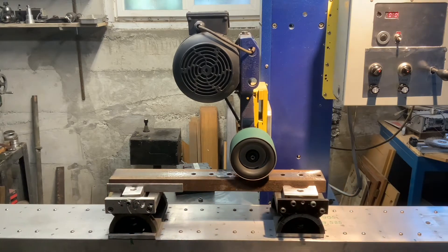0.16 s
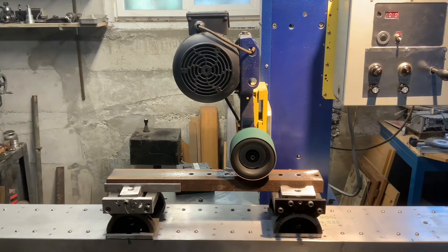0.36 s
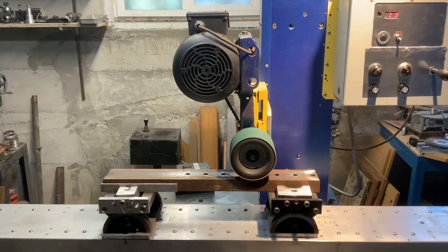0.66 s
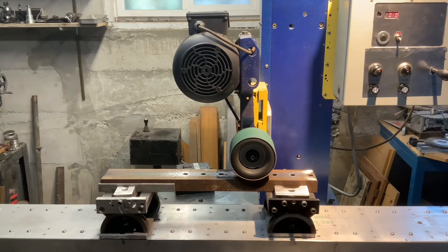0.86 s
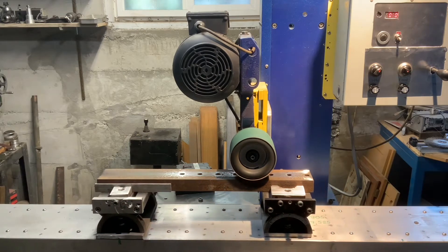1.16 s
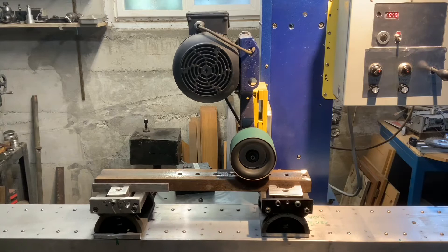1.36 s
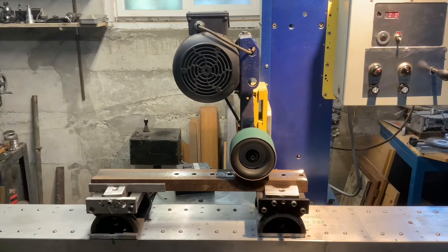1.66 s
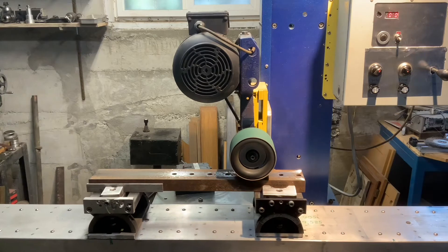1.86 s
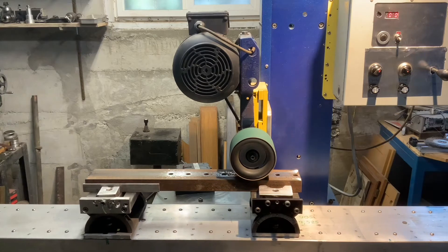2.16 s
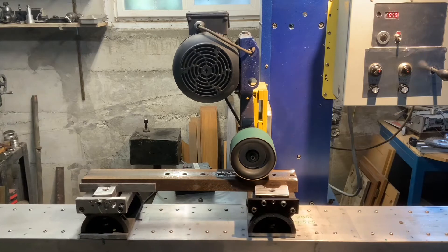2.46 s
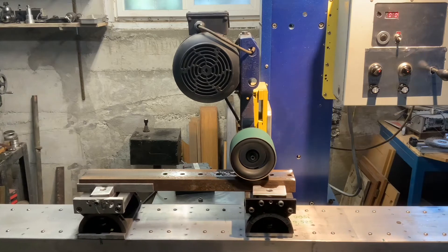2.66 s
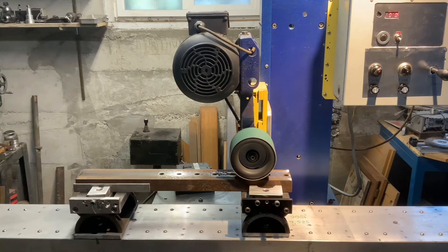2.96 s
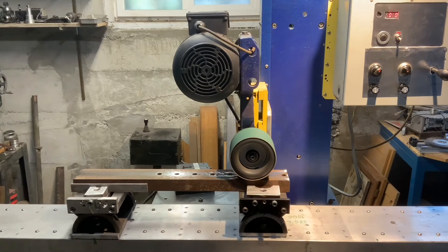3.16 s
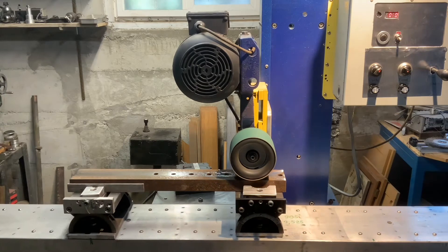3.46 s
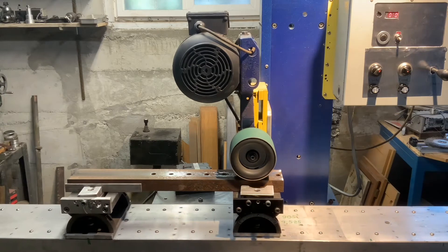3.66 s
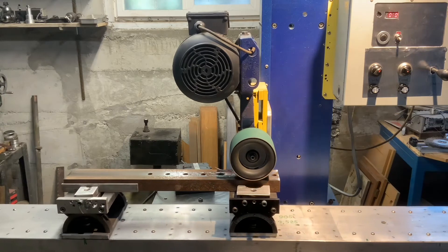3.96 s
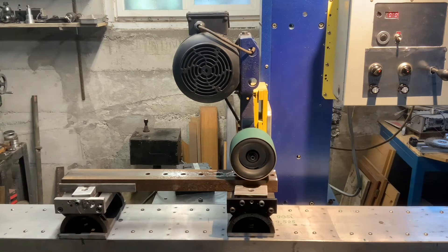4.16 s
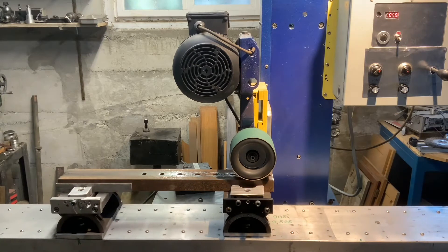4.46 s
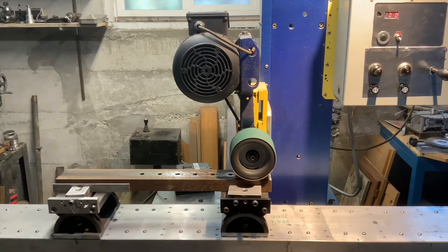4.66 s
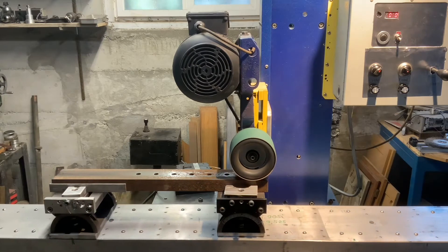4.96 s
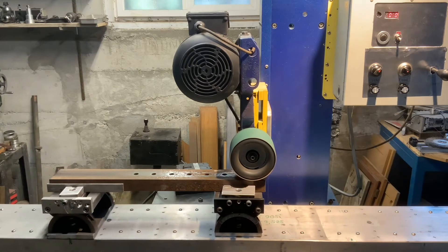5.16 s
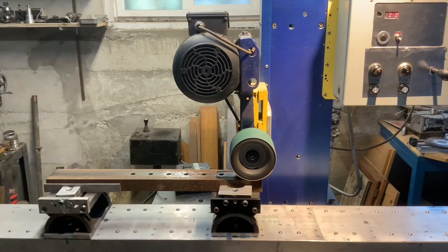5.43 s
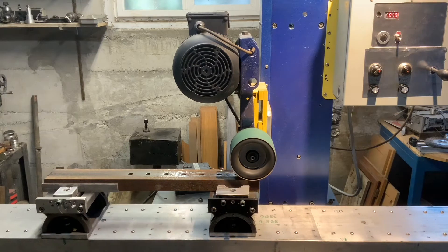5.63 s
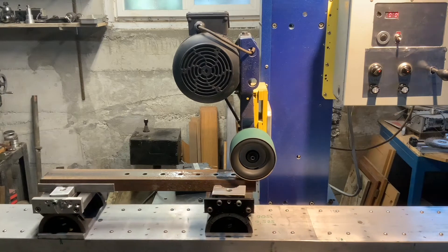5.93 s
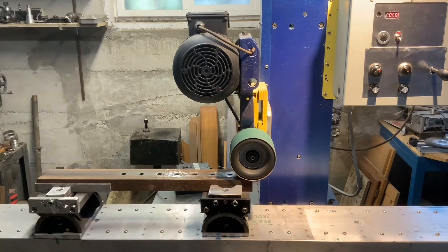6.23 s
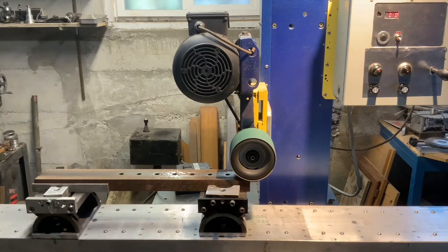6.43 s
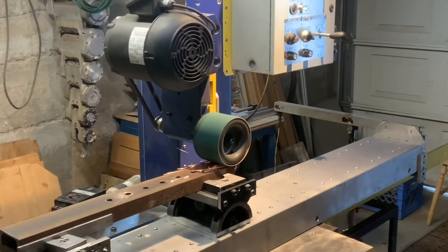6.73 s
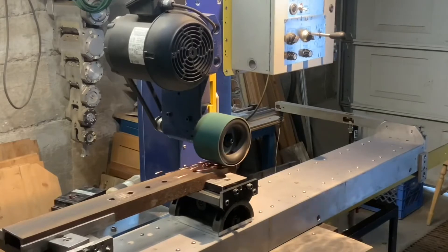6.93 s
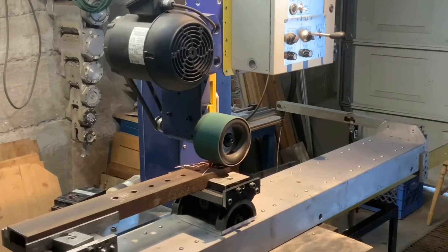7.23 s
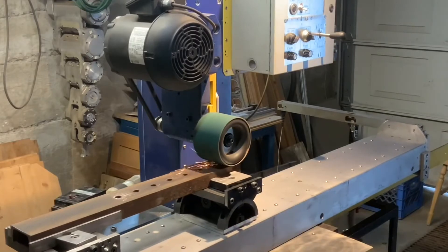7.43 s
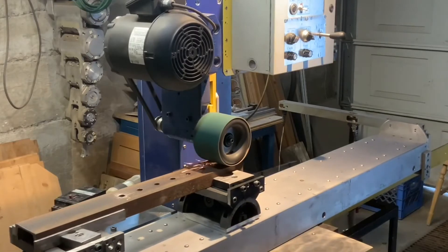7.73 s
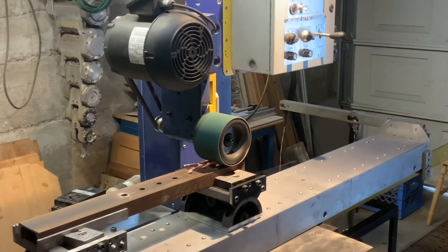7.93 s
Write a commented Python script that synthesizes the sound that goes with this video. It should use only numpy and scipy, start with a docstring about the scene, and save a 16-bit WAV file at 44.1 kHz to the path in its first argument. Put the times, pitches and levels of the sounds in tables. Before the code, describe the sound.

In a hard-walled workshop, a belt grinding machine runs without pause. A harsh, fluttering high whine dominates, with bright hiss from belt and motor fan and faint ringing of loose metal parts. The grind swells softly several times. Late on, the sound dips for an instant and resumes from a side position with altered tone; one soft low knock follows. Close stereo pickup, little bass.

```python
"""In a workshop, a belt surface grinder runs, heard from the front and, after a brief fade, from the side.
Bearing balls of the contact wheel roll over a flaw in the turning inner ring: a whine of modulated harmonics.
Loose parts ring with random pitch waver, shaken by the cage and the belt lap; belt and motor fan give
filtered noise, its treble pulsed by the balls. One soft knock sums two decaying modes.
Two microphone ports a little apart receive the sound with different phase, level and reflections."""
import sys
import numpy as np
from scipy import signal
from scipy.fft import rfft, irfft, next_fast_len
from scipy.io import wavfile
from scipy.ndimage import map_coordinates

SR = 44100
rng = np.random.default_rng(int(sys.argv[2]) if len(sys.argv) > 2 else 0)


def dump_mix(stems):
    """Bounce the given channels to the path in sys.argv[1] as a 16-bit WAV at rate SR."""
    frames = np.atleast_2d(stems).T  # one column per channel
    limited = np.clip(frames, -1, 1)  # hard clip at full scale
    pcm = np.round(limited * 32767).astype(np.int16)
    wavfile.write(sys.argv[1], SR, pcm)


N = 356769
T = np.arange(N) / SR
MOVE_S, FADE_OUT_S, FADE_IN_S = 6.46, 0.024, 0.015  # the listening place changes in a short fade
EDGE_S = 0.004  # fade-in at the very start
SIDE_ON = T > MOVE_S

# Knock modes: pitch_hz, level_db, t60_s
KNOCK_MODES = [(218, -0.5, 0.17), (275, -1, 0.13)]
KNOCK_S, KNOCK_DB = 7.1, -38.5

# Rattling guards and frame: pitch_hz, waver_hz, front_db, side_db, twice_cage_beat (log gain), belt_beat (log gain)
RATTLE_RINGS = [(274, 7, -75, -64, 0.1, 0.06), (452, 10.06, -67, -76, 0.13, 0.057),
                (479, 2.7, -75, -64.5, 0.09, 0.072), (665, 12.2, -68.5, -67.5, 0.074, 0.074),
                (986.6, 10, -62, -71.5, 0.45, 0.041), (1430, 16, -60.5, -63, 0.05, 0.034),
                (3140, 28, -64, -72, 1.5, 0.5)]
# The loose guard's wandering ring: time_s, pitch_hz, level_db
GUARD_TRACK = [(0.0, 1344, -62), (0.47, 1319, -56), (2.7, 1339, -61), (2.75, 1296, -57), (3.4, 1335, -62.5),
               (4.93, 1345, -59), (6.26, 1334, -55), (7.19, 1368, -63), (8.09, 1360, -62)]
# Modulation of that ring: waver_hz, twice_cage_beat (log gain), belt_beat (log gain)
GUARD_BEAT = (4, 0.06, 0.5)
RATTLE_ROUGH = 0.16  # quick random swing of each ring's log gain

# Source spectrum of the belt and fan hiss: frequency_hz, front_db (per Hz), side_db (per Hz)
HISS_SPECTRUM = [(161, -100, -103), (303, -88.5, -87), (630, -92, -90), (1020, -84, -88), (1250, -89, -88),
                 (1450, -85, -84), (1700, -89, -86), (2050, -83.5, -81), (2440, -86, -86), (2750, -81, -83),
                 (3150, -82, -84), (3600, -88, -86), (4000, -82, -86), (4300, -86, -87), (4740, -87, -84),
                 (5660, -81, -82.5), (6200, -78, -76), (7000, -73.5, -72.5), (7530, -70, -70),
                 (8800, -74.5, -72), (9600, -79, -77), (10700, -74, -73), (11100, -77, -81),
                 (15300, -78.5, -75)]
RASP_HZ = 5640  # lower edge of the pulsed treble
RASP_REPEAT = 0.76  # share of the treble that returns inverted with the next ball

# Balls passing the flaw, slipping with the load: time_s, rate_hz
BALL_PASS_RATE = [(0, 182.84), (0.4, 182.86), (1, 183.2), (1.75, 183.69), (2.3, 183.78), (3.5, 183.42),
                  (3.8, 183.2), (4.35, 182.46), (5.9, 182.42), (6.15, 183.05), (6.42, 184.35),
                  (6.62, 182.78), (6.9, 182.05), (8.09, 182.22)]
WHEEL_HZ, BALLS, BELT_TURNS = 33.62, 9, 5  # BELT_TURNS: wheel turns per belt lap

# Whine harmonics 1, 2, 3 .. of the ball rate: front_db, side_db
WHINE_LEVELS = [(-72, -73.5), (-72, -59), (-73, -69), (-68, -66.5), (-66.5, -70), (-66, -60.5), (-80, -81),
                (-60, -64), (-73, -66), (-57.5, -54), (-56, -58.5), (-68, -58.5), (-63, -81), (-60.5, -59),
                (-48.5, -57), (-67, -62), (-82, -83), (-76, -61), (-62, -59), (-80, -80), (-59, -68),
                (-59, -61), (-63, -71), (-61.5, -80), (-63, -61.5), (-68, -65), (-61, -54), (-60, -80),
                (-62.5, -65), (-57.5, -58), (-65, -57), (-50, -47), (-47.5, -52.5), (-63, -80),
                (-53.5, -49.5), (-76, -73), (-74, -51), (-44.5, -56), (-77, -80), (-68, -58), (-46.5, -58),
                (-35, -35.5), (-42.5, -37), (-49, -77), (-55, -63), (-61.5, -71), (-66, -75), (-47, -48),
                (-80, -66), (-52, -54)]
# Sidebands, as the flaw comes and goes once a turn: harmonic (multiple of ball rate), shift (wheel rates),
# spread (wheel rates), path_scatter (0-1), receding_gain (over approaching), receding_lag (half turns)
SIDEBANDS = [(8, 0, 0.45, 0.27, 0.55, 0.95), (10, .2, .8, .3, 0.3, 0.64), (11.2, 0, 0.65, 0.43, 0.89, 1),
             (15, .9, 0.8, 0.2, 2, 0.05), (22, 1, .7, 0.19, 1.2, 0.95), (26.1, 1.5, 0.46, 0.54, 1, 1),
             (36.5, 2, 0.81, 0.6, 1.2, 0.99), (42, 2.7, .7, .7, 1.6, 1), (47.2, 3.5, 0.6, 0.49, 0.8, 1)]
BETWEEN = 0.23  # share of the lines between the two shifted groups
CHIRP = 0.2  # radians per squared wheel rate: each beat of the whine glides upward
PATH_DRIFT_HZ = 1.247  # how quickly the sound paths of the whine lines change

# Slow drift: time_s, level_db, high_whine_db, top_hiss_db
SLOW_DRIFT = [(0, 1, 3, -0.5), (.5, -0.5, 3, 3), (1.1, 0, 2.5, -2), (1.8, 0.5, 1.5, 1), (2.3, 0, 0, -1.5),
              (3, -0.5, 3, -0.5), (3.7, 0, -1, 0), (4.4, 0.5, -0.5, -1.5), (5.2, -0.5, -2, -2.5),
              (6.1, 0, -2, 3.5), (6.44, -0.5, -8, -1), (6.49, 1, -3.5, 5), (6.9, -1, -3.5, 3),
              (7.3, -1.5, -2, 6.5), (7.7, -1.5, -4.5, 5), (8.09, -1.5, -2.5, 5)]
HIGH_WHINE_HZ, HIGH_WHINE_HALF_HZ = 7250, 810
TOP_HISS_HZ, TOP_HISS_HALF_HZ = 11600, 1730
# Tones that wax and wane on their own: pitch_hz, half_width_hz, curve (pairs of time_s, level_db)
WAXING_TONES = [(338, 52, [(6.44, 6), (6.49, 7.5), (6.8, -2)]), (7750, 52, [(1.5, -3), (3.7, -9), (4.2, 4),
                (5.9, 2), (6.44, 0), (6.49, 9)]), (7680, 91, [(6.44, 0), (6.49, -5)]), (1008, 26, [(0, 3),
                (1.5, 3.5), (3, -9), (6, -2), (6.44, 5)]), (1463, 13, [(0, 9), (1, -4), (4.7, -6), (4.9, 4),
                (5.7, 4), (6.44, 4.5), (6.8, -10)]), (460, 49, [(0, -10), (1.1, -1.5), (1.8, 6),
                (2.6, -3.5), (3.8, 2), (4.6, -1.5), (5.3, 0), (5.85, 4), (6.3, 1)]), (1822, 26, [(0, 7.5),
                (1, -11), (2.7, -5), (3.8, 2), (4.4, -8), (4.52, 6.5), (6.2, 7), (6.44, 17), (6.49, 3),
                (8.09, -4)]), (2024, 32, [(0, 8), (2.2, 0), (2.7, -2), (3.6, -0.5), (4.2, -3), (6.2, -1),
                (6.49, -1), (8.09, -4)])]
# The grind swells as the table feeds, perhaps as holes in the bar pass the wheel, and a narrow ring swells too:
# centre_s, level_db, half_length_s, ring_hz, ring_db
FEED_SWELLS = [(.97, 3, 0.22, 3830, 13), (2.77, 7, 0.29, 4050, 10), (4.36, 8.5, 0.32, 4010, 12),
               (5.747, 2.5, .25, 3970, 4), (6.62, 4, 0.42, 6020, 4)]
# Part each range takes in a swell: frequency_hz, share
SWELL_SHARE = [(3600, 0), (4030, 0.11), (4350, 1.34), (4800, 0.8), (5900, 0.97), (6600, 0.021),
               (7700, 0.074), (9000, 0.29)]
HISS_SWELL = 0.27  # share of a swell that the hiss follows
RING_HALF_HZ, RING_EARLY_S, RING_LONGER = 70, 0.04, 1.4  # RING_LONGER multiplies the swell's half length

ROOM_T60_S = 0.51
# Phase lead of the left port: frequency_hz, lead_rad
PORT_LEAD = [(0, 0), (2400, -.1), (2760, 1.3), (3790, .3), (5430, 0), (5940, -.6), (7840, -1.8),
             (8350, -1.1), (9040, -2.5), (9500, -3), (10300, -3.3), (10800, -4.2), (12600, -5.9),
             (13500, -6.28)]
# In the side view the lead shrinks at low frequencies: below_hz, share
SIDE_VIEW_LEAD = (6500, .4)
# Left port over right in the front view: frequency_hz, level_db
LEFT_OVER_RIGHT = [(2400, 0.5), (4400, -.5), (8100, -1), (14000, 0.5)]
# Reflected sound of opposite sign at the two ports: frequency_hz, level_db
OPPOSED_REFLECTION = [(200, -67), (400, -25), (700, -24), (1300, -13.5), (2400, -5), (4400, -9),
                      (7500, -10), (9000, -6), (10000, -11), (12000, -0.5), (14000, -18)]

LOW_CUT_HZ, TOP_HZ = 153, 15750
SELF_NOISE_DB = -118  # per Hz: the rising low slope, extended to 100 Hz, before roll-off


def undb(db):
    """Decibels express the logarithm of an amplitude ratio."""
    return 10 ** (np.asarray(db) / 20)


def bump(x, centre, half):
    """A Gaussian curve weights a range about its centre."""
    return np.exp(-((x - centre) / half) ** 2 / 2)


def turns(hz):
    """Phase in radians is the time integral of a rate, which may move."""
    return 2 * np.pi * np.cumsum(hz + 0 * T) / SR


def walk(rate):
    """Linear interpolation joins random levels drawn every 1 / rate seconds."""
    count = int(T[-1] * rate) + 2
    return np.interp(T * rate, np.arange(count), rng.standard_normal(count))


def noise(gain):
    """Spectral shaping gives white noise the amplitude density gain(Hz), in units per root Hz."""
    size = next_fast_len(N)
    white = rfft(rng.standard_normal(size))
    shaped = white * gain(np.fft.rfftfreq(size, 1 / SR)) * np.sqrt(SR / 2)
    return irfft(shaped, size)[:N]


def knock():
    """Modal decay: a soft blow on the bench excites damped sinusoids with a gradual onset."""
    age = np.maximum(T - KNOCK_S, 0)
    modes = 0
    for hz, db, t60 in KNOCK_MODES:
        decay = 1000. ** (-age / t60)
        modes = modes + undb(db) * np.sin(2 * np.pi * hz * age) * decay
    onset = 1 - np.exp(-age / 0.0056)
    return undb(KNOCK_DB) * onset * modes


def hiss(ball):
    """Turbulent broadband noise: the treble rasp puffs with every ball and half cancels at the next."""
    hz, *places = np.transpose(HISS_SPECTRUM)
    front, side = (noise(lambda f: undb(np.interp(np.log(f + 1), np.log(hz), db))) for db in places)
    rush = np.where(SIDE_ON, side, front)
    high_pass = signal.butter(3, RASP_HZ, "high", fs=SR, output="sos")
    treble = signal.sosfiltfilt(high_pass, rush)
    low = rush - treble
    one_ball_before = np.interp(ball - 2 * np.pi, ball, np.arange(N))  # sample position
    treble = treble - RASP_REPEAT * map_coordinates(treble, [one_ball_before], order=3)
    flicker = 0.07 * walk(25)
    puffs = 1 + 0.071 * np.cos(ball) + 0.13 * np.cos(2 * ball) + flicker
    return low + treble * puffs


def rattle(ball):
    """Amplitude modulation: wavering rings are shaken twice a cage turn and once a belt lap."""
    cage = turns(WHEEL_HZ) - ball / BALLS
    belt = turns(WHEEL_HZ / BELT_TURNS)
    times, *track = np.transpose(GUARD_TRACK)
    guard_hz, guard_db = (np.interp(T, times, column) for column in track)
    guard = (guard_hz, GUARD_BEAT[0], guard_db, guard_db, *GUARD_BEAT[1:])
    out = 0
    for hz, waver_hz, front_db, side_db, twice, lap in [*RATTLE_RINGS, guard]:
        ring = np.sqrt(2) * np.sin(turns(hz + waver_hz * walk(40)))
        beat = np.exp(twice * np.cos(2 * cage) + lap * np.cos(belt) + RATTLE_ROUGH * walk(45))
        level_db = np.where(SIDE_ON, side_db, front_db) + 0.63 * walk(2.0)
        out = out + undb(level_db) * beat * ring
    return out


def balls():
    """Rolling kinematics: the phase of the ball passes advances with a little slow and quick slip."""
    rate_hz = np.interp(T, *np.transpose(BALL_PASS_RATE))
    return turns(rate_hz + 0.0384 * walk(12) + 0.16 * walk(60))


def whine(ball, size=256):
    """Sideband modulation: the flaw circles with the wheel, splitting harmonics into lines a wheel rate apart."""
    place = (turns(WHEEL_HZ) / (2 * np.pi) * size).astype(int) % size  # position within the wheel turn
    side = np.fft.fftfreq(size, 1 / size)  # sideband number
    orders, *columns = np.transpose(SIDEBANDS)
    step, tone, out = np.exp(1j * ball), 1, 0
    for k, (front_db, side_db) in enumerate(WHINE_LEVELS, 1):
        tone = tone * step
        shift, spread, scatter, receding, lag = (np.interp(k, orders, c) for c in columns)
        lines = np.maximum(bump(abs(side), shift, spread), BETWEEN * (abs(side) < shift))
        lines = lines * np.where(side < 0, receding * np.exp(1j * np.pi * lag * side), 1)
        lines = lines * np.exp(-1j * CHIRP * side ** 2)
        # each line reaches the ear by its own path through housing and walls
        path_phase = np.exp(2j * np.pi * (rng.random() + scatter * rng.random((2, size))))
        path_gain = 1 + 0.19 * rng.standard_normal((2, size))
        turn = np.fft.ifft(lines * path_phase * path_gain) * size * np.sqrt(2) / np.linalg.norm(lines)
        # drift between two sets of paths
        mix = 1 / (1 + np.exp(0.69 * walk(PATH_DRIFT_HZ)))
        envelope = mix * turn[0, place] + (1 - mix) * turn[1, place]
        gain = np.where(SIDE_ON, undb(side_db), undb(front_db)) * (1 + 0.21 * walk(4))
        out = out + gain * (envelope * tone).real
    return out


def paths():
    """Reverberation by convolution: tones and hiss are heard straight and off the workshop walls."""
    ball = balls()
    direct = np.array([whine(ball) + rattle(ball), hiss(ball)])
    echo = rng.standard_normal(SR // 2) * 1000. ** (-T[:SR // 2] / ROOM_T60_S)
    echo = echo / np.linalg.norm(echo)
    bounced = signal.fftconvolve(direct, echo[None], axes=1)[:, :N]
    return np.array([direct, bounced])


def range_curves(hz, s, ranges):
    """Superposition in decibels: each Gaussian frequency range follows its own level curve."""
    return sum(np.outer(bump(hz, f, half), np.interp(s, *curve)) for f, half, curve in ranges)


def colour(hz, s):
    """Time-varying filtering: dB of swells, drift and waxing tones, for tones and for hiss."""
    times, level, high, top = np.transpose(SLOW_DRIFT)
    drift = np.interp(s, times, level) + range_curves(hz, s, [
        (HIGH_WHINE_HZ, HIGH_WHINE_HALF_HZ, (times, high)), (TOP_HISS_HZ, TOP_HISS_HALF_HZ, (times, top))])
    tones = range_curves(hz, s, [(f, half, np.transpose(curve)) for f, half, curve in WAXING_TONES])
    swells = 0
    swell_share = np.interp(hz, *np.transpose(SWELL_SHARE))
    for at, swell_db, half, ring_hz, ring_db in FEED_SWELLS:
        same_view = (s > MOVE_S) == (at > MOVE_S)
        swells = swells + np.outer(swell_share, same_view * swell_db * bump(s, at, half))
        ring_curve = same_view * ring_db * bump(s, at - RING_EARLY_S, half * RING_LONGER)
        tones = tones + np.outer(bump(hz, ring_hz, RING_HALF_HZ), ring_curve)
    return np.array([drift + swells + tones, drift + HISS_SWELL * swells])


def scene():
    """Two-port reception: phase lead, level and opposed reflections separate left from right."""
    hz, s, parts = signal.stft(paths(), SR, nperseg=1024)
    direct, bounced = (undb(colour(hz, s)) * parts).sum(axis=1)
    left_db = np.outer(np.interp(hz, *np.transpose(LEFT_OVER_RIGHT)), s < MOVE_S)
    below_hz, side_share = SIDE_VIEW_LEAD
    share = np.where(np.outer(hz < below_hz, s > MOVE_S), side_share, 1)
    lead_rad = np.interp(hz, *np.transpose(PORT_LEAD))[:, None] * share
    lead = np.exp(0.5j * lead_rad) * undb(left_db / 2)  # half on each port
    opposed = undb(np.interp(hz, *np.transpose(OPPOSED_REFLECTION)))[:, None] * bounced
    ports = np.array([direct * lead + opposed, direct / lead - opposed])
    pair = signal.istft(ports, SR, nperseg=1024)[1]
    fade = np.clip(np.where(SIDE_ON, (T - MOVE_S) / FADE_IN_S, (MOVE_S - T) / FADE_OUT_S), 0, 1)
    return fade * np.clip(T / EDGE_S, 0, 1) * (pair[:, :N] + knock())


def record(dry):
    """Band limiting: the recorder cuts the rumble, adds its own faint low noise and cuts the top."""
    low_cut = signal.butter(4, LOW_CUT_HZ, "high", fs=SR, output="sos")
    dry = signal.sosfilt(low_cut, dry)
    dry = dry + noise(lambda f: undb(SELF_NOISE_DB) * f / 100 / (1 + (f / 150) ** 3))
    top_cut = signal.ellip(12, 0.2, 60, TOP_HZ, fs=SR, output="sos")
    return signal.sosfilt(top_cut, dry)


dry = scene()
out = record(dry)
dump_mix(out)
```